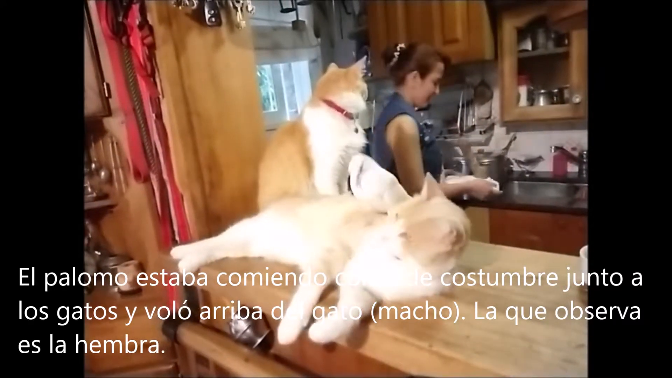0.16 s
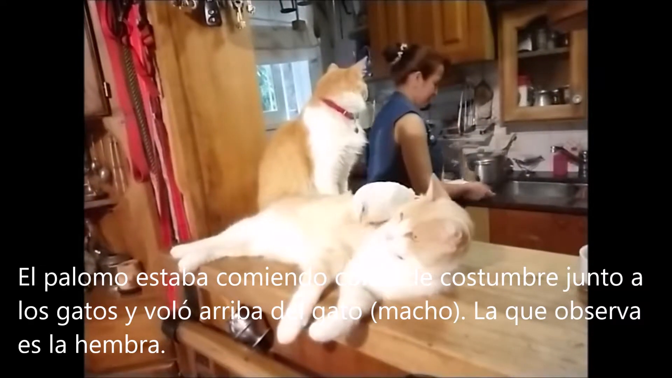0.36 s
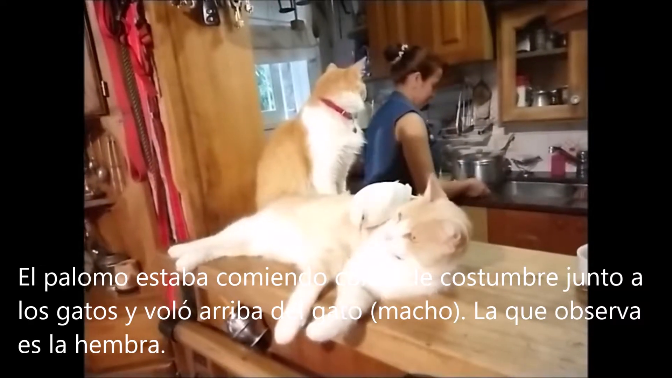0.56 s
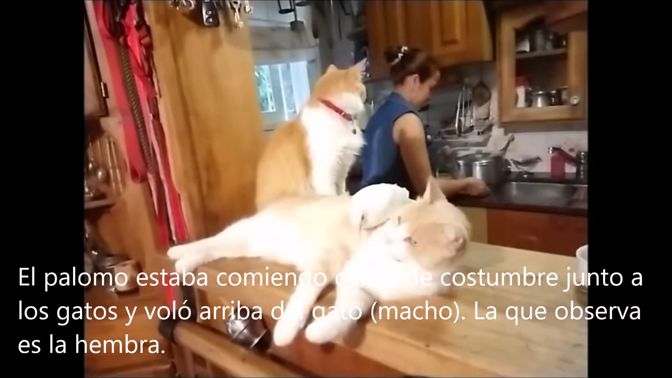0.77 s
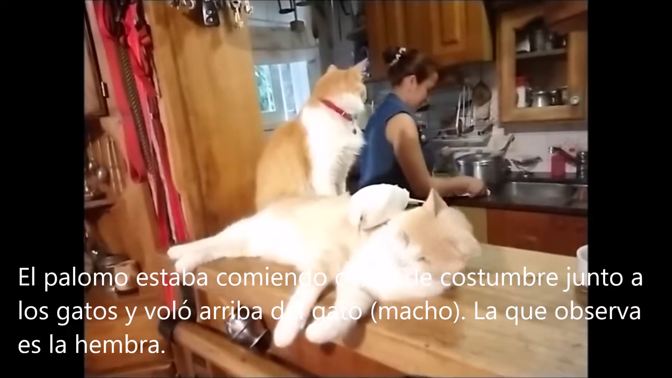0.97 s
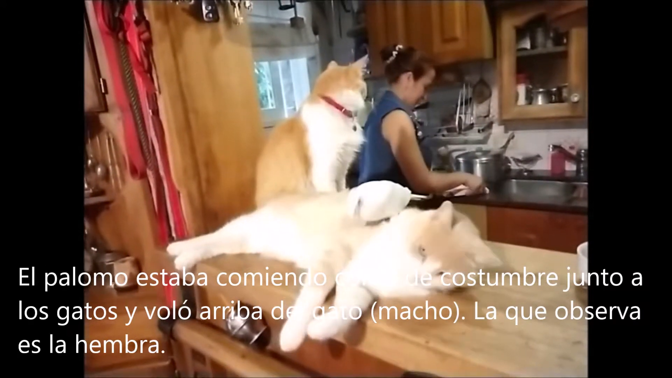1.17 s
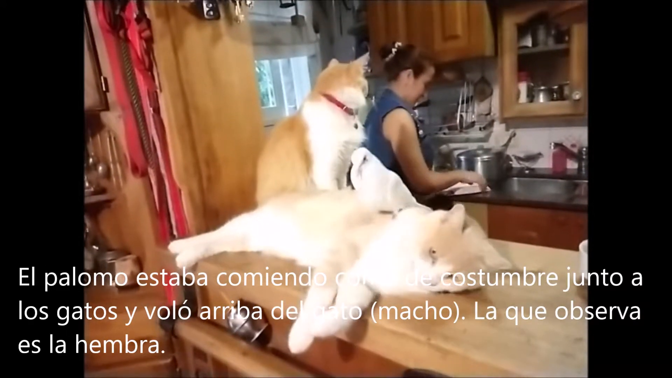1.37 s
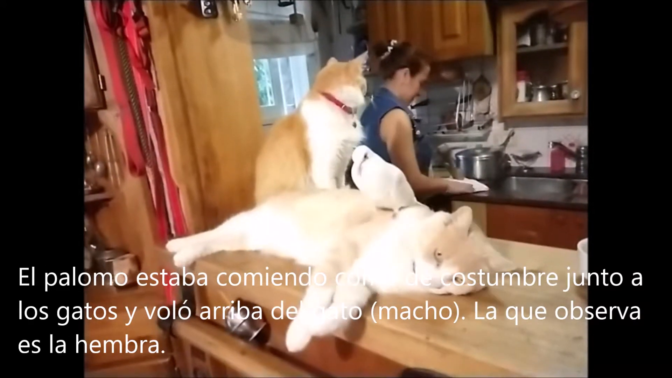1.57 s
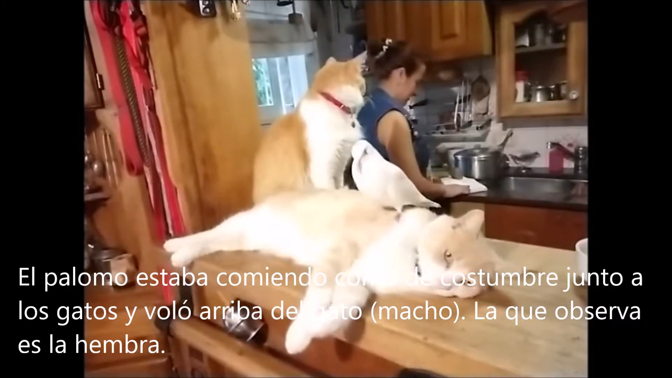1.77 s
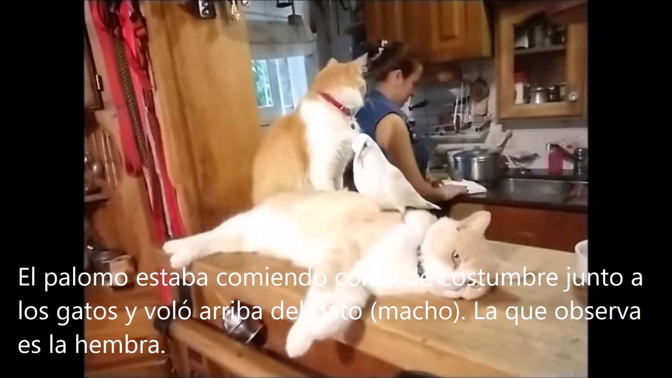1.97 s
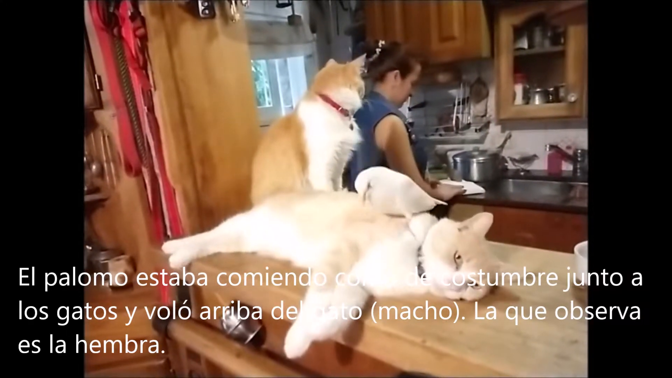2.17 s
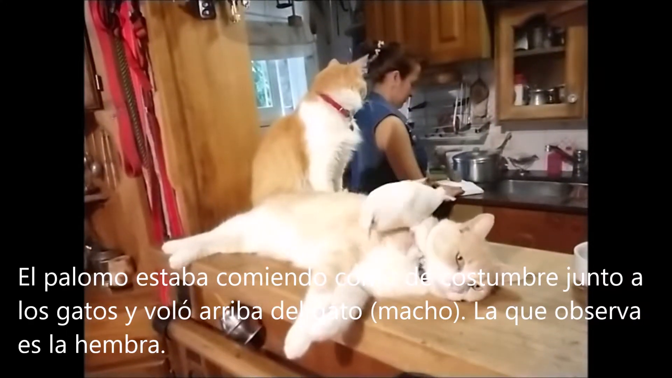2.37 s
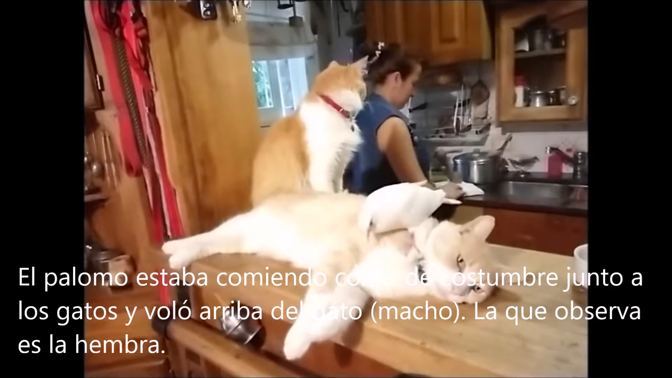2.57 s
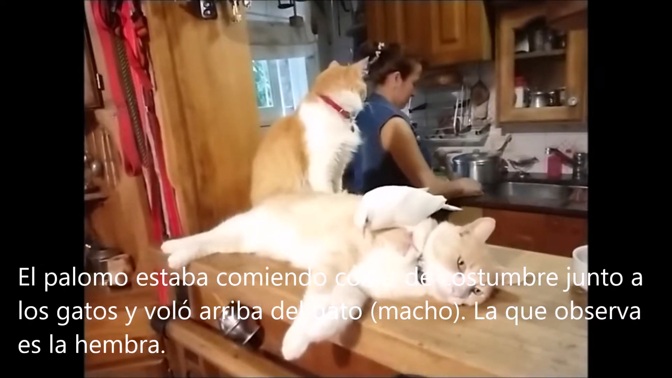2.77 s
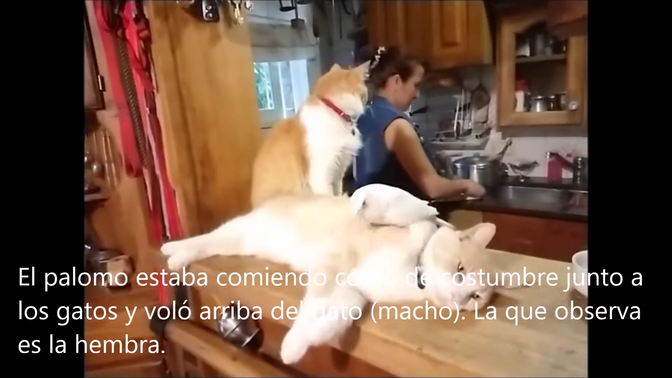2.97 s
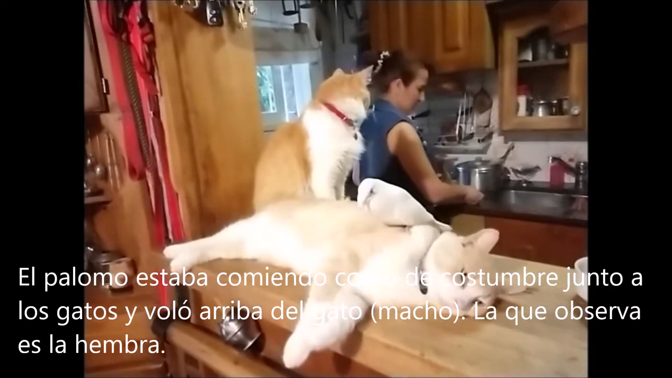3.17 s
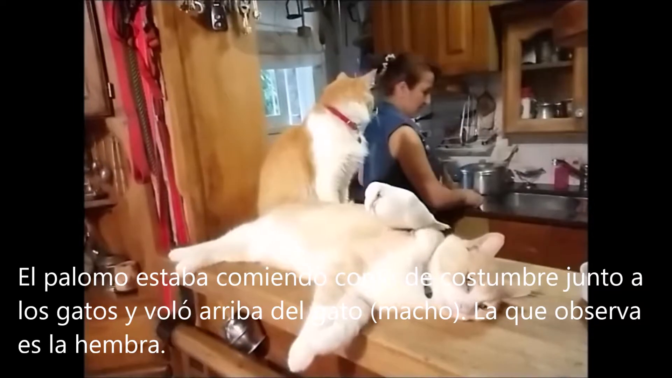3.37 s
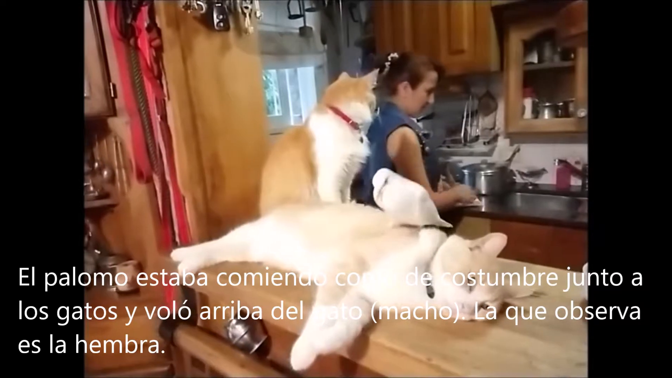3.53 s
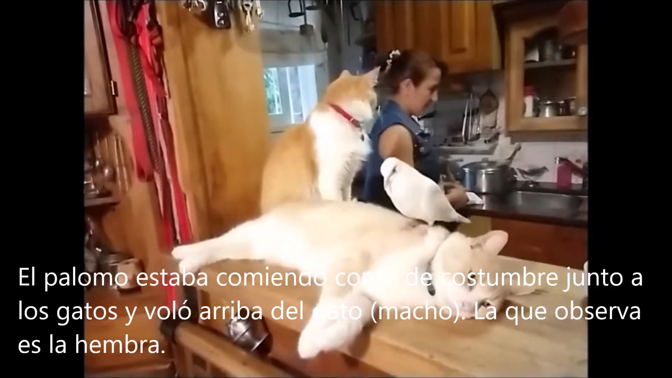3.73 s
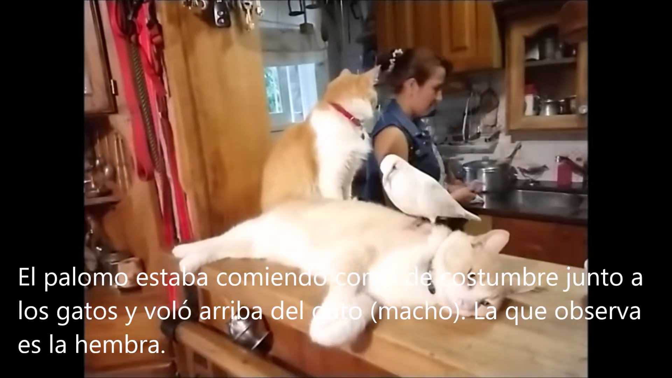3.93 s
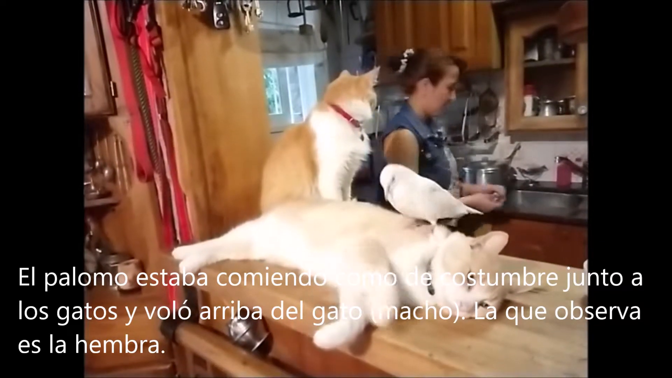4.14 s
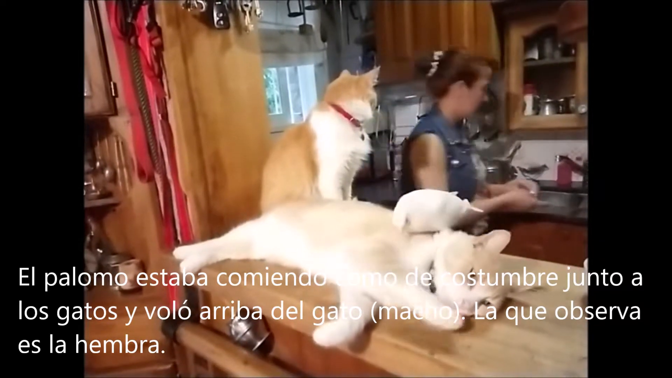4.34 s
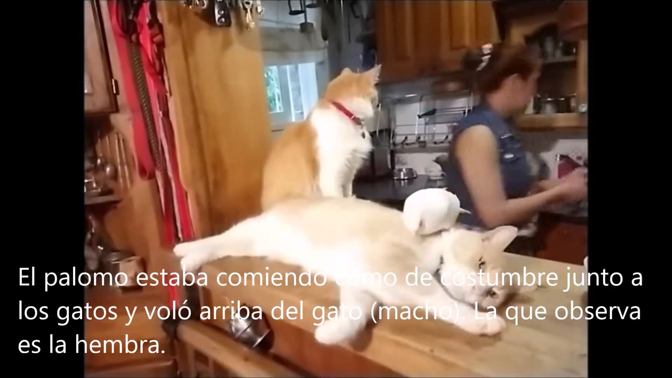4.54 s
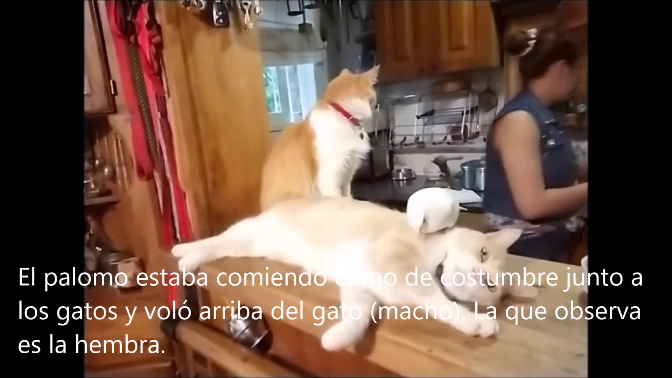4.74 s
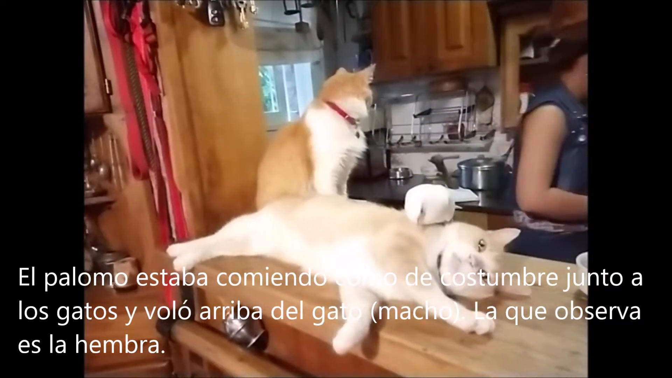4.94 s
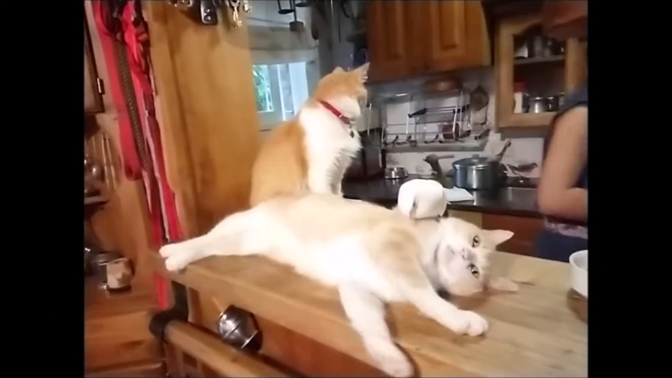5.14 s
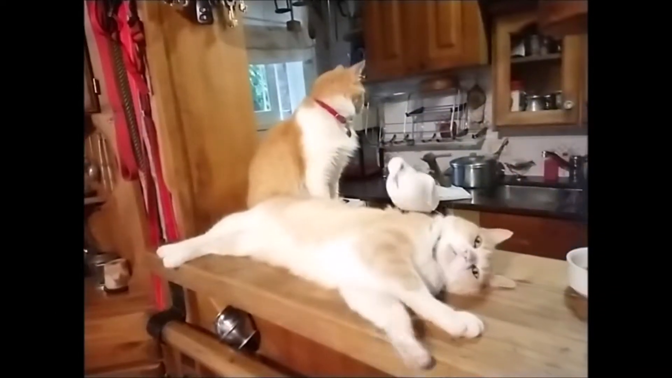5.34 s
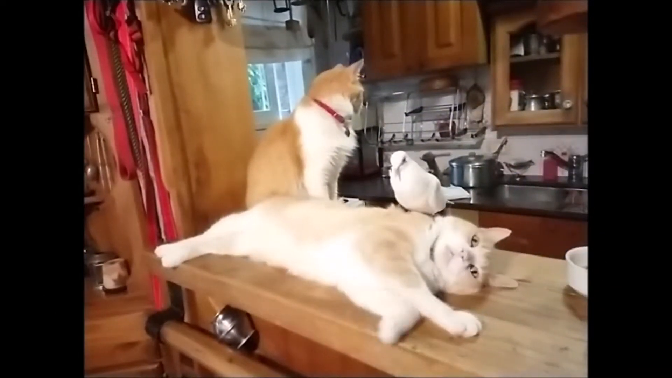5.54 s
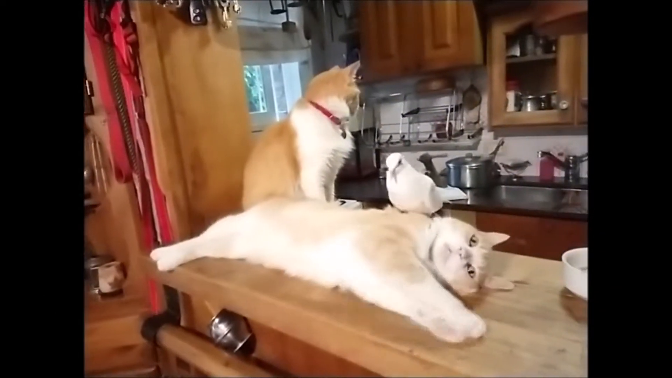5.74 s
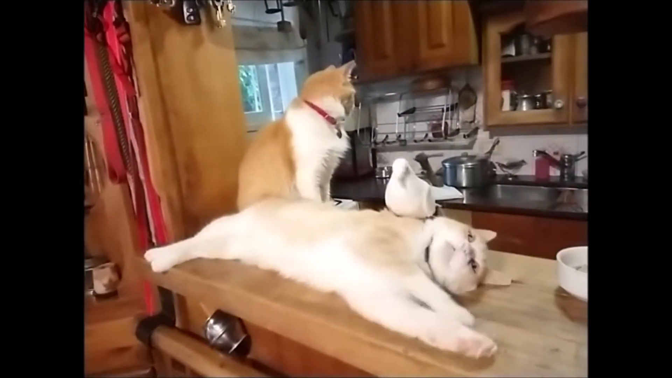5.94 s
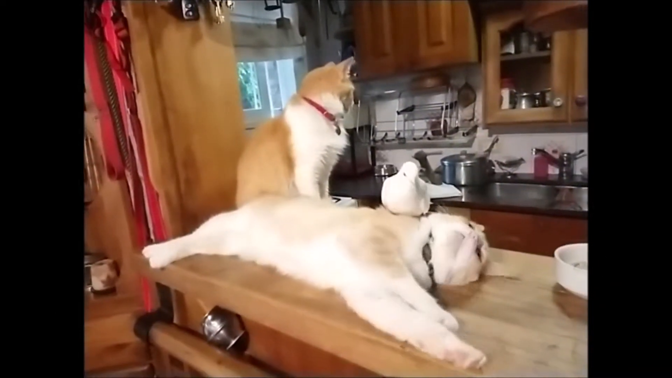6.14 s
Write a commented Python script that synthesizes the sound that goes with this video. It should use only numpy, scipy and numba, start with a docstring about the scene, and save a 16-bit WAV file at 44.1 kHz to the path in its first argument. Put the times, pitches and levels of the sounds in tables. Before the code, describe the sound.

A small, lightly echoing kitchen heard through a phone microphone a metre or two from a dove, with quiet room noise and a wavering fridge hum throughout. The end of a soft buzzy in-breath is heard at 0 s, and a barely audible thin high whistle glides by at 0.2-0.5 s. The first call begins at 0.4 s with a short hollow hoot, then a rolled trill from 0.9 s opens into a long hoot that falls away by 1.6 s, followed by a low buzzy in-breath. The same call returns at 2.4 s, trilling from 2.8 s, hooting until 3.6 s, and again at 4.3 s, trilling from 4.8 s, hooting until 5.5 s; each ends with the buzz. Fur and cloth rustle faintly, most clearly near 1.3 s. Small ticks are scattered, with dull table thumps at 1.1 and 1.7 s and a sharper click at 5.9 s.

```python
"""In a small kitchen, a metre or two from a phone's microphone, a dove coos three times over a fridge's hum.
Each call is a short hoot, a rolled trill that opens into a long falling hoot, then a soft buzzy in-breath note.
The bird is a set of gliding harmonic tones, shaken in pitch and level, with echoes and room modes.
Rustling fur and cloth, and the room noise, are coloured noise in flickering octave bands; small ticks are
damped modes, and a brief thin whistle is one gliding sine."""
import sys
import numpy as np
from scipy import signal
from scipy.fft import rfft, irfft, next_fast_len
from scipy.io import wavfile
from scipy.ndimage import uniform_filter1d
from numba import njit

SR = 44100
rng = np.random.default_rng(int(sys.argv[2]) if len(sys.argv) > 2 else 0)


def wav_out(sig):
    """Save sig, one row per channel (or a flat mono array), as 16-bit PCM at SR to the path in sys.argv[1]."""
    wavfile.write(sys.argv[1], SR, np.round(np.clip(np.atleast_2d(sig).T, -1, 1) * 32767).astype(np.int16))


N = 273508  # length in samples


def undb(db):
    """Decibel law: amplitude gain is ten to the power dB / 20."""
    return 10 ** (np.asarray(db) / 20)


def level(x, db):
    """Effective level: scale a signal to a given rms value in dB."""
    return x * undb(db) / np.sqrt(np.mean(x ** 2))


def panned(x, pan_db):
    """Interchannel level difference: two channels whose mean is x, the left pan_db above the right."""
    ratio = undb(pan_db)
    left = 2 * x * ratio / (1 + ratio)
    right = 2 * x / (1 + ratio)
    return np.array([left, right])


def add(out, start_s, sound):
    """Superposition: sum a stereo sound into the mix, trimming what lies outside it."""
    i = int(start_s * SR)
    sound, i = sound[:, max(-i, 0):], max(i, 0)
    out[:, i:i + sound.shape[1]] += sound[:, :N - i]


def ring(x, hz, width_hz):
    """Resonance: a two-pole filter with unit gain at its centre."""
    return signal.lfilter(*signal.iirpeak(hz, hz / width_hz, SR), x)


def walk(rate_hz):
    """Random modulation: levels held for one period, then slewed twice; spread near 1."""
    hold = int(SR / rate_hz)
    steps = np.repeat(rng.standard_normal(N // hold + 1), hold)
    return 0.62 * uniform_filter1d(uniform_filter1d(steps, hold), hold)[:N]


def on_log(hz, table):
    """Logarithmic frequency scale: interpolate a (Hz, value) table along it."""
    table_hz, value = np.transpose(table)
    return np.interp(np.log(hz), np.log(table_hz), value)


# Level difference of the noise between the ears of the stereo pair.
# Each row: frequency in Hz, left minus right in dB.
NOISE_PAN = [(60, -7), (700, -3), (1800, -10), (5000, -3), (15000, -6)]
# Interchannel coherence of the noise. Each row: frequency in Hz, left-right likeness from -1 to 1.
NOISE_LIKENESS = [(25, -0.27), (60, 1), (150, .93), (300, .85), (650, 0.78), (1400, -0.034), (5000, -0.041)]


def hiss(colour, flicker_db, rate_hz):
    """Band-filtered noise: unit-rms stereo, octave bands flickering independently, coherent mainly in the bass."""
    n = next_fast_len(N)
    f = np.maximum(np.arange(n // 2 + 1) * SR / n, 1.)
    alike = np.clip(on_log(f, NOISE_LIKENESS), -1, 1)
    a, b = rfft(rng.standard_normal((2, n)))
    left = alike * a + np.sqrt(1 - alike ** 2) * b
    spectra = panned(undb(on_log(f, colour)), on_log(f, NOISE_PAN)) * [left, a]
    out = np.zeros((2, N))
    for octave in range(4, 15):  # triangular bands centred on 2 ** octave Hz
        band = spectra * np.clip(1 - abs(np.log2(f) - octave), 0, 1)
        out += irfft(band, n)[:, :N] * undb(flicker_db * walk(rate_hz))
    return out / np.sqrt(np.mean(out.mean(axis=0) ** 2))


def tone(s, hz, db, orders, edge_s=0.0027, rough=.2):
    """Harmonic series: multiples of one gliding phase, soft-edged; roughness shakes pitch and level."""
    t = s[0] + np.arange(int((s[-1] - s[0]) * SR)) / SR
    noise = rng.standard_normal((2, len(t)))
    shake = uniform_filter1d(uniform_filter1d(noise, size=160), size=160)
    shake /= shake.std()
    pitch_hz = np.interp(t, s, hz) * (1 + 0.037 * rough * shake[0])
    phase = 2 * np.pi * np.cumsum(pitch_hz) / SR
    to_edge_s = np.minimum(t - s[0], s[-1] - t)
    edges = np.sin(np.pi / 2 * np.clip(to_edge_s / edge_s, 0, 1)) ** 2
    wave = sum(undb(gain_db) * np.sin(round(k) * phase) for k, gain_db in orders)
    loudness = undb(np.interp(t, s, db) + 5.4 * rough * shake[1])
    return t, np.sqrt(2) * wave * loudness * edges


# Spectrum of the steady room noise. Each row: frequency in Hz, relative density in dB per Hz.
ROOM_NOISE = [(15, -61.5), (25, -15), (166, -2), (300, -6), (438, -6), (589, -12.5), (656, -10.5),
              (1360, -16.5), (2100, -13.5), (3060, -34), (6340, -29.5), (7260, -38.5), (15900, -44)]


def room_noise():
    """Stationary broadband noise: a fixed spectrum whose octave bands flicker gently."""
    return undb(-62.5) * hiss(ROOM_NOISE, 0.73, 9.9)


# Wavering hum lines. Each row: centre in Hz, bandwidth in Hz, rms level in dB.
FRIDGE_LINES = [(171.8, 5, -68), (2184, 11, -80), (2626, 23, -85.5), (3482, 16, -88.5)]


def fridge():
    """Narrow-band noise: white noise through sharp resonances gives lines that waver."""
    out = np.zeros((2, N))
    for hz, width_hz, db in FRIDGE_LINES:
        line = ring(rng.standard_normal(N), hz, width_hz)
        out += panned(level(line, db), -2.0)
    return out


# A thin high glide. Each row: time in seconds, pitch in Hz, level in dB.
WHISTLE_GLIDE = [(0.2, 11859, -93), (0.272, 12896, -86), (0.304, 12388, -84), (0.382, 12627, -81),
                 (0.414, 11742, -98), (0.469, 12329, -93)]


def whistle():
    """Frequency modulation: one sine follows a gliding pitch."""
    out = np.zeros((2, N))
    s, hz, db = np.transpose(WHISTLE_GLIDE)
    add(out, s[0], panned(tone(s, hz, db, [(1, 0.01)])[1], -22.0))
    return out


# Spectra of the bright hiss and the duller scuff.
# Each row: frequency in Hz, relative density in dB per Hz.
BRIGHT_COLOUR = [(5000, -25.5), (7500, 1.5), (11000, 0), (14000, 0), (15900, 1.5)]
DULL_COLOUR = [(600, -6.5), (1200, 2.5), (2500, -5), (4500, -5), (6500, -4.5), (8000, -30)]
# Swells of friction. Each row: peak time in seconds, time to drop 10 dB in seconds (at least 0.01 is used),
# bright level in dB, dull part over bright in dB.
RUSTLE_SWELLS = [(0, 0.18, -74, 5), (.5, 0.03, -77.5, 18), (.76, 0.21, -69, 1), (1.13, 0.13, -64.5, 5),
                 (1.31, 0.0436, -55.5, 3.5), (1.67, 0.24, -79, 6), (1.86, 0.27, -73, 4),
                 (2.29, .2, -74.5, 3.5), (2.48, 0.09, -72.5, 6.5), (3.22, .2, -82, 14),
                 (3.47, 0.25, -74.5, 6.5), (4.12, 0.12, -73, 3), (4.27, 0.04, -66, -5), (4.44, 0, -71, 5),
                 (4.55, 0.15, -72, 6.5), (5.01, -0.04, -80, 4), (5.16, 0.4, -78, 6.5),
                 (5.645, 0.09, -69, 4), (5.87, -0.12, -70, -8), (6.2, 0.5, -78, 5)]


def swell_gain(rest_db, swells_db, t):
    """Incoherent addition: the rest level and all swells add as powers."""
    power = undb(rest_db) ** 2 + (undb(swells_db) ** 2).sum(axis=0)
    return np.interp(np.arange(N) / SR, t, np.sqrt(power))


def rustle():
    """Sliding friction: fur and cloth give swelling, finely grained noise, a bright hiss over a dull scuff."""
    peak_s, drop_s, bright_db, dull_over_db = np.transpose(RUSTLE_SWELLS)[:, :, None]
    t = np.arange(0, N / SR + .01, .005)
    swell_db = bright_db - 10 * abs(t - peak_s) / np.maximum(drop_s, .01)
    bright = hiss(BRIGHT_COLOUR, 1.2, 11) * swell_gain(-86.5, swell_db, t)
    dull = hiss(DULL_COLOUR, 3.5, 30) * swell_gain(-74, swell_db + dull_over_db, t)
    grain = undb(1.2 * walk(60))
    return (bright + dull) * grain


# Ticks and knocks. Each row: start in seconds, starting level of the ring in dB, ring in Hz,
# time to decay 60 dB in seconds, left minus right in dB.
TICK_MODES = [(0.4977, -48, 2500, 0.0059, 4), (1.0850, -46, 1840, 0.026, -10),
              (1.108, -47, 1300, 0.025, -11), (1.6695, -36, 1300, 0.0081, -20),
              (1.9252, -54, 1800, 0.0088, -6), (2.3253, -51, 2500, 0.0089, 2),
              (2.386, -54, 1980, .006, -10), (2.7824, -55.5, 1981, 0.0055, -9),
              (4.85, -56, 2000, 0.027, -5), (5.6396, -56.5, 3010, 0.0092, -21),
              (5.8932, -40, 5230, 0.0048, -14)]
# Dull thumps through the table. Each row: start in seconds, starting level in dB, pitch in Hz.
TABLE_THUMPS = [(1.11, -43.5, 220), (1.672, -42, 142)]


def knocks():
    """Damped free vibration: each tick rings one mode with a noisy crack; two come with a table thump."""
    out = np.zeros((2, N))
    t = np.arange(int(.08 * SR)) / SR
    for s, db, hz, t60_s, pan_db in TICK_MODES:
        fade = np.exp(-np.log(1000) * t / t60_s)
        crack = ring(rng.standard_normal(len(t)), 1.2 * hz, 1.6 * hz)
        add(out, s, panned(undb(db) * fade * (np.sin(2 * np.pi * hz * t) + 0.83 * crack), pan_db))
    for s, db, hz in TABLE_THUMPS:
        thump = np.exp(-t / 0.0065) * np.sin(2 * np.pi * hz * t)
        add(out, s, panned(undb(db) * thump, -13.5))
    return out


# Throat clucks ahead of the short hoots and trills.
# Each row: start in seconds, peak level in dB, pitch in Hz.
THROAT_CLUCKS = [(.372, -51, 712), (.864, -43.5, 576.6), (2.351, -46.5, 706.7), (2.829, -46, 616.6),
                 (4.293, -48, 657), (4.760, -49.5, 610)]


def clucks(out):
    """Windowed tone burst: a few cycles of a sine under a short rounded envelope."""
    t = np.arange(int(0.0078 * SR)) / SR
    envelope = np.hanning(len(t)) ** .5
    for s, db, hz in THROAT_CLUCKS:
        add(out, s, panned(undb(db) * envelope * np.sin(2 * np.pi * hz * t), -5.5))


def shaped_notes(out, notes, shape, orders, rough):
    """Similarity of contour: every note stretches one shared course of pitch and level."""
    share, pitch, shape_db = np.transpose(shape)
    fine = np.linspace(0, 1, 100)
    for start_s, length_s, hz, db in notes:
        s = start_s + length_s * fine
        note_hz = hz * np.interp(fine, share, pitch)
        note_db = db + np.interp(fine, share, shape_db)
        add(out, s[0], panned(tone(s, note_hz, note_db, orders, 0.0028, rough)[1], -4.5))


# In-breath notes, the first already under way at time zero.
# Each row: start in seconds, length in seconds, top pitch in Hz, level in dB.
INBREATH_NOTES = [(-.16, 0.23, 255, -49), (1.61, .27, 261.1, -44.5), (3.59, .24, 257.6, -46.5),
                  (5.53, 0.24, 249.5, -48.5)]
# Their course. Each row: share of the length, pitch as a ratio to the top, level in dB.
INBREATH_COURSE = [(0, .94, -13.5), (.15, 0.99, -2), (0.301, 1.0, -0.5), (0.601, .89, -2.5),
                   (.82, .78, -14), (1, .74, -22.5)]
# Their harmonics. Each row: multiple of the fundamental, level in dB.
INBREATH_HARMONICS = [(1, -3.5), (2, -4), (3, -5.5), (4, -19), (5, -31)]


def inbreaths(out):
    """Harmonic richness: several strong multiples of a low pitch make a soft buzz."""
    shaped_notes(out, INBREATH_NOTES, INBREATH_COURSE, INBREATH_HARMONICS, rough=.22)


# Faint second voice under the held notes.
# Each row: start in seconds, length in seconds, pitch in Hz, level in dB.
SECOND_VOICE_NOTES = [(.5, 0.11, 566, -53), (1.24, .18, 567, -50), (2.45, 0.11, 556, -52),
                      (3.19, .12, 553.2, -52.5), (4.38, 0.084, 553.4, -52.5)]
# Its course. Each row: share of the length, pitch as a ratio to the held pitch, level in dB.
SECOND_VOICE_COURSE = [(0, 0.95, -1.5), (.5, 1.01, -0.5), (.75, 1.02, -6.5), (1, 1.12, -10.5)]


def second_voice(out):
    """Two simultaneous sources: a faint, rough, lower sine sounds beneath the hoots."""
    shaped_notes(out, SECOND_VOICE_NOTES, SECOND_VOICE_COURSE, [(1, 0)], rough=.55)


# Leaking overtones. Each row: multiple of the fundamental, level in dB when that is at 793 Hz.
LEAKING_OVERTONES = [(2, -59.5), (3, -65), (4, -79), (5, -74), (6, -74), (8, -77)]


def coo(out, s, hz, db, pan_db, rough, edge_s):
    """Acoustic filtering: beak shut, the swollen throat passes almost only the fundamental."""
    t, voice = tone(s, hz, db, [(1, 0.003)], edge_s, rough)
    # turbulent air flutters the tone and spreads a faint halo 400 Hz either side of it
    air = signal.lfilter(*signal.butter(2, 400, fs=SR), rng.standard_normal(len(t)))
    voice = voice * (1 + level(air, -42 + 70 * rough))
    # overtones fade as the pitch sinks, the higher ones faster
    sag_db = 11.5 * np.log2(hz / 793)
    leak = sum(tone(s, hz, (k - 1) * sag_db, [(k, gain_db)], 0.011, 0.48 * rough)[1]
               for k, gain_db in LEAKING_OVERTONES)
    opposite = [[-1], [1]]  # polarity of the leak, left and right
    add(out, s[0], panned(voice, np.interp(t, s, pan_db)) + panned(leak, -12.0) * opposite)


# Trill beats. Each row: start in seconds, length in seconds, level in dB, pitch swing in Hz.
TRILL_BEATS = [(0.88, 0.063, -37.5, 161), (0.931, 0.05, -36, 77), (0.982, 0.052, -34, 176.7),
               (1.039, 0.07, -31, 187.4), (1.113, .05, -29, 199.7), (2.839, 0.077, -38, 140),
               (2.893, 0.045, -33.5, 124.3), (2.948, 0.045, -31.5, 109), (3, 0.065, -31, 173),
               (3.071, 0.047, -28.5, 161), (4.774, .05, -36.5, 130.4), (4.828, 0.047, -32, 148),
               (4.874, 0.053, -31, 90), (4.922, 0.065, -30.5, 187), (4.981, 0.077, -30.5, 156.4),
               (5.056, 0.046, -28.5, 187.1)]
# Course of one beat. Each row: share of its length, pitch from bottom 0 to top 1, level in dB.
BEAT_COURSE = [(0, -.05, -7.5), (.12, .4, -2.5), (.28, .96, 0), (.42, .8, -2), (.58, .1, -2),
               (.75, 0.47, -9.5), (.9, 0.17, -1.5), (1, 0, -8)]


def trill(out):
    """Pressure-driven pitch: air pressure swells and sags in each beat, and the pitch follows it."""
    share, pitch, shape_db = np.transpose(BEAT_COURSE)
    pan_db = np.full(len(share), -5.5)
    for start_s, length_s, db, swing_hz in TRILL_BEATS:
        top_hz = 722.5 + 8 * (db + 30)  # a stronger beat reaches higher, 8 Hz per dB
        # no two beats run alike
        stray_pitch = .12 * rng.standard_normal(len(share))
        stray_db = 1.8 * rng.standard_normal(len(share))
        hz = top_hz - swing_hz * (1 - pitch - stray_pitch)
        coo(out, start_s + length_s * share, hz, db + shape_db + stray_db, pan_db, rough=.19, edge_s=.004)


# Standing waves at the microphone. Each row: pitch in Hz, gain in dB, left minus right in dB.
STANDING_WAVES = [(450, 0, 1), (545, 0, -5), (563, -1.5, -4), (595, -2, -3.5), (670, 0, -6.5), (700, 1, -5),
                  (701, -2.5, -5), (718, 1, -9), (734.7, -1, -13.5), (757.5, -5, -9.5), (765, 1.5, -1.5),
                  (820, -0.5, -6), (816, 1, 4)]


def hoot(out, note, shape, sag_from, rough):
    """Standing waves: a leap, a sagging held pitch and a fall, with level and side set by pitch."""
    stage = np.linspace(0, 3, 150)  # 0 to 3 along the note's four times
    times_s, pitches_hz, db, catch_db = note[:4], note[4:7], note[7], sum(note[8:])
    at, pitch, shape_db = np.transpose(shape)
    held_hz = np.interp(stage, [sag_from, 2, 2.7], pitches_hz)
    hz = held_hz * np.interp(stage, at, pitch)
    room_hz, room_db, pan_db = np.transpose(STANDING_WAVES)
    db = db + np.interp(stage, at, shape_db) + np.interp(hz, room_hz, room_db)
    # the catch: a brief change of level around stage 1
    db = db + catch_db * np.clip(1 - abs(stage - 1) / .13, 0, 1)
    s = np.interp(stage, np.arange(4), times_s)
    coo(out, s, hz, db, np.interp(hz, room_hz, pan_db), rough, edge_s=.012)


# Short hoots. Each row: start, crest, beginning of the fall and end in seconds, top pitch,
# pitch where the fall begins and pitch it falls to in Hz, level in dB.
SHORT_NOTES = [(0.423, .472, .6, .642, 813.6, 736, 614, -33.5),
               (2.4, 2.451, 2.572, 2.61, 806, 745, 560, -32),
               (4.342, 4.39, 4.51, 4.562, 819.5, 714, 604, -31.5)]
# Long hoots. Each row: start, opening of the voice, beginning of the fall and end in seconds, top pitch,
# pitch where the fall begins and pitch it falls to in Hz, level in dB, catch as the voice opens in dB.
LONG_NOTES = [(1.158, 1.362, 1.482, 1.595, 772.1, 699, 596, -32, -11),
              (3.122, 3.26, 3.425, 3.572, 775.3, 700.7, 546.4, -31, -7.5),
              (5.105, 5.224, 5.355, 5.5, 752.6, 696.2, 545, -28.5, -5)]
# Their courses. Each row: stage from 0 to 3, pitch as a ratio to the sagging held pitch, level in dB.
SHORT_COURSE = [(0, .58, -1), (.2, .63, -1), (.5, 0.94, -0.5), (.75, .99, 0), (1, 1, 0), (1.12, 1, 0),
                (1.45, 0.96, -1.5), (2, 0.98, 1), (2.7, 0.96, -3), (3, .85, -10.5)]
LONG_COURSE = [(0, .73, -0.5), (.2, .95, 0), (.4, .99, -1), (.6, 0.99, -0.5), (.85, 1.0, -2.5),
               (1.15, 0.99, 1), (1.6, 1.006, 0.5), (2, 0.98, 1.5), (2.35, 0.97, 1.5), (2.7, 0.98, -1),
               (2.85, .95, -6), (3, 0.78, -23)]


def hoots(out):
    """Near-sinusoidal phonation: short and long hoots, the long ones steadier and sagging sooner."""
    for note in SHORT_NOTES:
        hoot(out, note, SHORT_COURSE, sag_from=1, rough=.12)
    for note in LONG_NOTES:
        hoot(out, note, LONG_COURSE, sag_from=.6, rough=.075)


def dove():
    """Source and filter: all the bird's notes sum, and a high-pass at 370 Hz stands for the throat."""
    out = np.zeros((2, N))
    for voice in (clucks, inbreaths, second_voice, trill, hoots):
        voice(out)
    throat = signal.butter(4, 370, "high", fs=SR, output="sos")
    return signal.sosfilt(throat, out)


# Echoes off the nearest surfaces. Each row: delay in seconds, left level in dB, right level in dB.
NEAR_ECHOES = [(.00985, -13, -6), (.0135, -9, -21), (.0255, -10, -12), (.0327, -4.5, -15)]


def near_echoes(bird, hits):
    """Early reflection: delayed, weaker copies return from the nearest surfaces."""
    out = np.zeros((2, N))
    for delay_s, left_db, right_db in NEAR_ECHOES:
        add(out, delay_s, undb([[left_db], [right_db]]) * (bird + 0.3 * hits))
    return out


@njit
def walls(x, lags, gain, damp):
    """Diffuse reverberation: eight delay lines feed each other, duller on every round."""
    line, soft, out = np.zeros((8, 2048)), np.zeros(8), np.zeros((2, len(x)))
    for i in range(len(x)):
        total = 0.
        for k in range(8):
            soft[k] += (1 - damp) * (gain[k] * line[k, (i - lags[k]) & 2047] - soft[k])
            total += soft[k]
            out[k % 2, i] += soft[k]
        for k in range(8):
            line[k, i & 2047] = x[i] + soft[k] - total / 4
    return out


# Delays of the eight wall paths. Each entry: delay in samples.
WALL_DELAYS = np.array([811, 947, 1093, 1237, 1399, 1571, 1759, 1973])


def wall_tail(mid):
    """Exponential decay: each line's gain sets a 60 dB fall in 0.33 s, before the damping."""
    gain = undb(-60 * WALL_DELAYS / SR / 0.33)
    tail = walls(mid + 1e-18, WALL_DELAYS, gain, .6)
    return undb(-11) * tail * undb([[-2.5], [2.5]])


# The room's strongest modes. Each row: frequency in Hz, gain at the centre in dB,
# time to decay 60 dB in seconds.
STRONG_MODES = [(455, -1, 0.033), (545, -0.5, 0.07), (640, -10, 0.8), (683, -3.5, 0.12)]


def room_modes(mid):
    """Room resonance: bandwidth is inversely proportional to decay time."""
    modes = sum(undb(db) * ring(mid, hz, np.log(1000) / np.pi / t60_s) for hz, db, t60_s in STRONG_MODES)
    return panned(modes, -2.0)


def scene():
    """Superposition: background, rustle, and the bird and knocks heard direct and through the room."""
    background = room_noise() + fridge() + whistle()
    bird, hits = dove(), knocks()
    direct = bird + hits
    mid = direct.mean(axis=0)
    room = near_echoes(bird, hits) + wall_tail(mid) + room_modes(mid)
    return background + rustle() + direct + room


def record(dry):
    """Band limiting: the phone's microphone drops the deepest bass and the top is cut at 15750 Hz."""
    dry = signal.sosfilt(signal.butter(2, 56.7, "high", fs=SR, output="sos"), dry)
    return signal.sosfilt(signal.ellip(10, .2, 70, 15750, fs=SR, output="sos"), dry)


dry = scene()
out = record(dry)
wav_out(out)
```